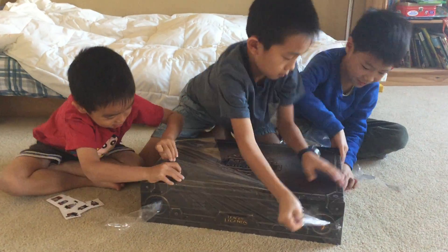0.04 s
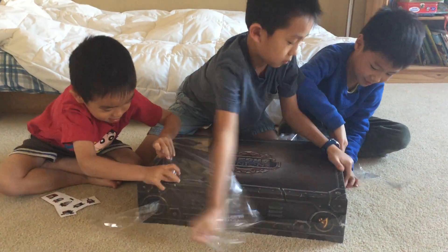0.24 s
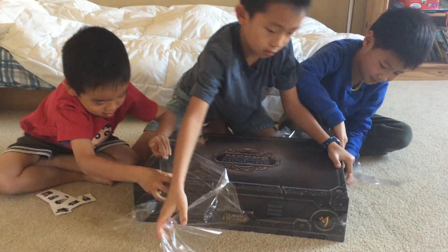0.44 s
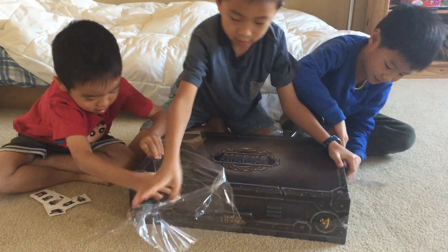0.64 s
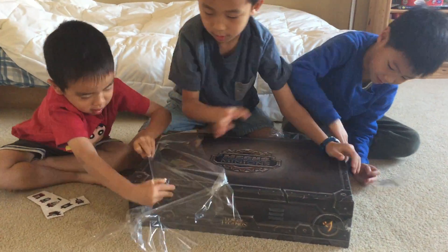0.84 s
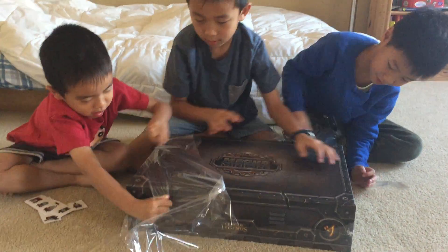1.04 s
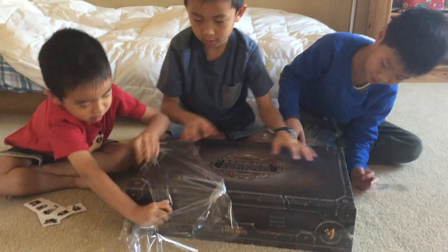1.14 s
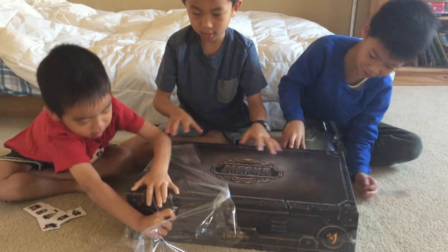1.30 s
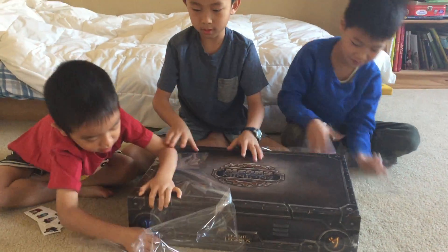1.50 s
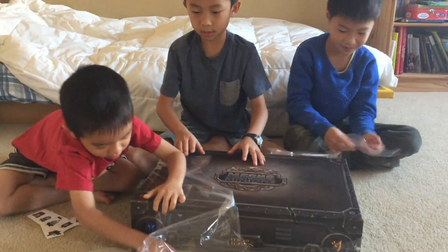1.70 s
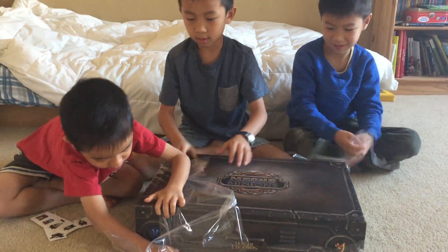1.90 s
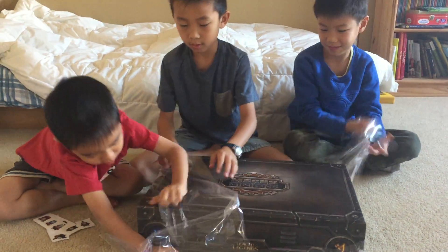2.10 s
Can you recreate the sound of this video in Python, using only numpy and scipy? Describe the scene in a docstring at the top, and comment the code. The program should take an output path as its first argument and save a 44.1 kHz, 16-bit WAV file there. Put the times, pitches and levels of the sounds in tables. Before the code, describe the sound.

Stiff clear film rips, ticks and rustles on a big box in a carpeted bedroom

```python
"""In a carpeted bedroom, plastic shrink-wrap is pulled off a big cardboard box near one microphone.
The film tears in sharp snaps and its creases tick: short damped modes with a noisy crack. Loose film
crinkles as a swarm of tiny pings, swishes over the lid as grainy noise and squeaks in narrow bands.
Hands knock the box, which rings in low modes, and soft thuds come through the floor as single pushes
of air. Noise tails make the room ring briefly, over a deep rumble and faint hiss."""
import sys
import numpy as np
from scipy import signal
from scipy.fft import rfft, irfft, next_fast_len
from scipy.io import wavfile
from scipy.ndimage import uniform_filter1d, map_coordinates

SR = 44100
rng = np.random.default_rng(int(sys.argv[2]) if len(sys.argv) > 2 else 0)


def bounce(signal):
    """Save signal as a 16-bit WAV file at the path given by the first command-line argument."""
    frames = np.transpose(np.atleast_2d(signal))
    limited = np.clip(frames, -1, 1)
    pcm = np.round(limited * 32767).astype(np.int16)
    wavfile.write(sys.argv[1], SR, pcm)


N = 94815  # length in samples
TOP_HZ = 15950  # band limit of the recorder, and the highest crinkle pitch


def amp(db):
    """Decibels to gain."""
    return 10 ** (np.asarray(db) / 20)


def unit(x):
    """Scale to rms 1."""
    return x / np.sqrt(np.mean(x ** 2) + 1e-20)


def decay(t, t60):
    """Exponential decay that falls 60 dB in t60 seconds."""
    return np.exp(-np.log(1000) * t / t60)


def along(points, hz):
    """Read (Hz, value) points on a log frequency axis."""
    point_hz, values = np.transpose(points)
    return np.interp(np.log(hz + 1), np.log(point_hz + 1), values)


def filtered(x, gain):
    """Multiply the spectrum by a gain that is a function of frequency."""
    size = next_fast_len(len(x) + 8192)  # padding keeps the end from wrapping onto the start
    spectrum = rfft(x, size) * gain(np.fft.rfftfreq(size, 1 / SR))
    return irfft(spectrum, size)[:len(x)]


def coloured(x, points):
    """Shape the spectrum of x by (Hz, dB) points and scale it to rms 1."""
    return unit(filtered(x, lambda hz: amp(along(points, hz))))


def add(track, s, sound):
    """Mix a sound into the track at s seconds."""
    start = max(round(s * SR), 0)
    part = sound[:max(N - start, 0)]
    track[start:start + len(part)] += part


def room(x):
    """The bedroom's answer: a fresh diffuse noise tail whose highest treble dies first."""
    # decay time of the room: pitch_hz, t60_s
    room_t60 = [(200, 0.38), (550, 0.35), (1400, 0.28), (3700, 0.34), (9000, 0.28), (15000, 0.18)]
    # colour of the room's answer: pitch_hz, level_db
    room_colour = [(100, 5), (400, 1.5), (700, -1), (1250, 3.5), (1900, 3), (2800, 0.5), (4000, -4.5),
                   (5500, -1.5), (7500, 0.5), (9500, -1.5), (15000, 4.5)]
    build_s = 0.001
    hz, t, noise = signal.stft(rng.standard_normal(SR // 2), SR, nperseg=256)
    colour = amp(along(room_colour, hz)[:, None])
    fade = decay(t, along(room_t60, hz)[:, None])
    tail = signal.istft(noise * colour * fade, SR)[1]
    tail = tail * (1 - np.exp(-np.arange(len(tail)) / SR / build_s))
    return signal.fftconvolve(x, tail / np.linalg.norm(tail))


def ring(modes, t, scatter):
    """Damped modes whose level, pitch and phase differ a little at every blow."""
    out = np.zeros(len(t))
    for hz, db, t60 in modes:
        level = amp(db + rng.normal(0, 0.5))
        pitch_hz = hz * np.exp(scatter * rng.normal())
        out += level * decay(t, t60) * np.sin(2 * np.pi * (pitch_hz * t + rng.random()))
    return out


def click(tilt_db, low_hz):
    """One buckling of the film, of energy 1: its modes and a noisy crack, with little bass."""
    # modes of the taut film: pitch_hz, level_db, t60_s
    film_modes = [(580, -33.5, 0.0069), (1328, -15, 0.0078), (3390, 0, 0.0033), (4830, 1, .004),
                  (8230, 2, 0.0031), (9050, -4.5, 0.0017), (13500, -9.5, 0.0018)]
    film_scatter, attack_s, high_hz = 0.14, .00008, 14300
    crack_db, crack_t60_s = -1, 0.0036
    t = np.arange(SR // 50) / SR
    crack = amp(crack_db) * rng.standard_normal(len(t)) * decay(t, crack_t60_s)
    burst = (ring(film_modes, t, film_scatter) + crack) * (1 - np.exp(-t / attack_s))
    # tilt in dB per octave, flattening out below 1 kHz
    burst = filtered(burst, lambda hz: amp(tilt_db * np.log2(hz + 1000)))
    band = signal.butter(2, [low_hz, high_hz], 'band', fs=SR, output='sos')
    burst = signal.sosfilt(band, burst)
    return burst / np.linalg.norm(burst)


def clicks(rows, low_hz, count):
    """Play (s, dB, room dB, tilt) clicks; the walls get each from count sides, each with its own colour."""
    out = np.zeros(N)
    for s, db, room_db, tilt_db in rows:
        add(out, s, amp(db) * click(tilt_db, low_hz))
        for _ in range(count):
            side_gain = amp(db + room_db) / np.sqrt(count)
            add(out, s, side_gain * room(click(tilt_db, low_hz)))
    return out


def hush():
    """Deep rumble and faint hiss of the room, as steady coloured noise."""
    # colour of the quiet room: pitch_hz, level_db
    hush_colour = [(8, 18), (14, 20.5), (25, 5.5), (50, -3), (110, -13), (230, -8.5), (400, -20.5),
                   (1000, -28.5), (3000, -22), (8000, -33), (11000, -36), (16000, -38)]
    return amp(-48) * coloured(rng.standard_normal(N), hush_colour)


def crinkling():
    """A swarm of tiny creases in clusters, each a short ping of its own pitch and size with a crack."""
    # how loudly the loose film crinkles: time_s, level_db
    crinkle_level = [(0, -43.5), (.07, -60), (.1, -47.5), (.13, -51.5), (.2, -42.5), (.28, -46.5),
                     (.4, -57), (.52, -63), (.61, -62.5), (.66, -56), (.76, -49.5), (.81, -66), (.95, -61),
                     (1.1, -60), (1.34, -53.5), (1.41, -66), (1.48, -51.5), (1.53, -45.5), (1.6, -70),
                     (1.64, -48), (1.74, -48), (1.83, -61), (1.89, -54), (1.92, -57.5), (1.95, -54.5),
                     (1.99, -52.5), (2.07, -55.5), (2.15, -51.5)]
    # colour of the swarm: pitch_hz, level_db
    crinkle_colour = [(150, -19), (380, -0.5), (520, -3), (750, 0.5), (1100, -4), (1600, -2.5), (3200, 1),
                      (4600, -2.5), (6000, -2.5), (9100, -3), (10600, -16.5), (14000, -7.5), (16000, -26)]
    creases_per_s, crease_t60_s, crack_db = 2200, 0.0054, -5.5
    cluster_db, clusters_per_s, spread_db = 3.1, 70, 5
    room_db = -4.5
    t = np.arange(N) / SR
    age = np.arange(SR // 150) / SR

    starts = np.flatnonzero(rng.random(N) < creases_per_s / SR)
    # a smooth random curve makes denser and thinner moments by level
    clusters = cluster_db * map_coordinates(rng.standard_normal(N), [t * clusters_per_s])
    spread = spread_db * np.minimum(rng.exponential(size=len(starts)), 3)
    size = amp(clusters[starts] + spread)[:, None]
    hz = TOP_HZ * rng.random(len(starts))[:, None]
    where = starts[:, None] + np.arange(len(age))
    # creases that overlap share the same crack noise
    crack = amp(crack_db) * rng.standard_normal(N + len(age))[where]
    grains = size * (np.sin(2 * np.pi * hz * age) + crack) * decay(age, crease_t60_s)

    swarm = np.bincount(where.ravel(), grains.ravel(), N)[:N]
    swarm = coloured(swarm, crinkle_colour) * amp(np.interp(t, *np.transpose(crinkle_level)))
    return swarm + amp(room_db) * room(swarm)[:N]


def knocking():
    """The hollow box rings low under the hands; each knock tilts the balance of its modes."""
    # hand knocks: start_s, level_db, tilt_db_per_octave
    knocks = [(.001, -40.5, -10), (0.084, -47.5, 7), (0.18, -45, 11), (.241, -43, 0), (.471, -44.5, -3),
              (0.6461, -38.5, 0.5), (0.704, -44, -11), (0.736, -45, 2), (1.502, -37.5, 1), (1.568, -44, -1),
              (1.796, -64.5, 13)]
    # modes of the cardboard box: pitch_hz, level_db, t60_s
    box_modes = [(217.2, -4.5, 0.13), (263.4, -3, 0.089), (334, -9.5, 0.072), (467, -5.5, 0.068),
                 (528, 3.5, 0.019)]
    attack_s, room_db = 0.001, -13
    t = np.arange(SR // 3) / SR
    out = np.zeros(N)
    pivot_hz = box_modes[1][0]
    for s, db, tilt_db in knocks:
        modes = [(hz, level + tilt_db * np.log2(hz / pivot_hz), t60) for hz, level, t60 in box_modes]
        knock = ring(modes, t, scatter=0.031) * (1 - np.exp(-t / attack_s))
        add(out, s, amp(db) * knock)
    return out + amp(room_db) * room(out)[:N]


def squeaking():
    """Rubbed film and lid sing in fast, uneven stick and slip: gliding narrow bands of noise."""
    # squeaks: peak_s, half_length_s, level_db, pitch_hz, glide_octaves_per_s
    squeaks = [(0.019, 0.02, -53, 110.5, 1.5), (0.045, 0.029, -57, 2720, 1.5),
               (.39, 0.09, -57, 218.5, -1.5), (0.445, 0.0068, -47.5, 8780, -9),
               (0.456, .005, -49, 4060, -18), (0.474, 0.0043, -44.5, 1950, -36.5),
               (0.494, 0.00262, -38, 7170, -2.5), (0.857, .012, -51.5, 2830, 6),
               (0.875, 0.0067, -58, 6700, -1), (0.891, 0.023, -52, 8840, -0.5),
               (0.891, .015, -56, 3310, -1.5), (1.185, 0.013, -57.5, 871, 0.5),
               (1.311, 0.033, -55.5, 3520, 1.5), (1.435, 0.053, -64, 500, 0), (1.969, .004, -54, 3650, -28)]
    width, blur_hz, room_db = 0.1, 34.8, -7.5  # band width is a share of the pitch plus blur_hz
    out = np.zeros(N)
    t = np.arange(-SR // 8, SR // 8) / SR
    for s, half, db, hz, glide in squeaks:
        blur = lambda f: np.exp(-(f / (width * hz + blur_hz)) ** 2)
        a, b = (unit(filtered(rng.standard_normal(len(t)), blur)) for _ in range(2))
        pitch_hz = hz * 2 ** (glide * np.clip(t, -2 * half, 2 * half))
        phase = 2 * np.pi * np.cumsum(pitch_hz) / SR
        # two slow noises on a cosine and a sine make a band of noise around the pitch
        rub = amp(db) * np.exp(-(t / half) ** 2) * (a * np.cos(phase) + b * np.sin(phase))
        add(out, s + t[0], rub[s + t >= 0])
    return out + amp(room_db) * room(out)[:N]


def ticking():
    """Single creases flip as the film is handled, thinner than the snaps; each rebounds once, more weakly."""
    # crease flips: start_s, level_db, tilt_db_per_octave
    ticks = [(.0258, -23, -12), (.0348, -30, 0), (0.035, -23, -4), (0.0851, -14.5, -13),
             (0.0924, -14.5, -6.5), (0.1577, -24, 7), (0.163, -24, 5), (0.1806, -30, -7), (.196, -23, 15),
             (0.282, -14, 7), (0.395, -28, 3.5), (0.4914, -23, -9), (0.5495, -25, -7), (0.5526, -36, -1),
             (0.575, -28.5, -2.5), (.6311, -31, 13), (.6585, -25.5, -11.5), (0.69, -43, 0),
             (0.7084, -21.5, 3), (0.7095, -17, -10), (.7468, -25, -2.5), (0.828, -25.5, -20.5),
             (0.831, -35, 13), (1.0826, -21, -2), (1.1142, -23.5, -5.5), (1.135, -24, -2),
             (1.16, -29, -4.5), (1.162, -27, -7), (1.1708, -25, 1), (1.179, -21, -9), (1.1798, -31, -4),
             (1.184, -29, 15), (1.2025, -28, 3), (1.2492, -24.5, -2), (1.348, -29, 4), (1.407, -36, -1),
             (1.4373, -29, -2.5), (1.5018, -30, 3), (1.509, -27, -1), (1.5136, -17.5, -5), (1.523, -15, -6),
             (1.5256, -24, -4), (1.5275, -16.5, -1.5), (1.5301, -10.5, -2), (1.5325, -15.5, -0.5),
             (1.5347, -27, 4), (1.5407, -23.5, 3), (1.5972, -26.5, 1.5), (1.621, -24, -3),
             (1.6308, -24.5, -1), (1.6369, -22.5, 4), (1.6517, -36, 3), (1.6695, -33.5, -8),
             (1.6968, -22, -3), (1.7009, -18, -3.5), (1.734, -24, -9), (1.863, -30, -3),
             (1.9355, -28, -8.5), (1.9588, -30, 0), (1.977, -27, -5), (2.0839, -25, -3), (2.1297, -26, -2)]
    low_hz, room_db = 680, -3
    rebound_s, rebound_db = .0016, -10  # the delay varies from half to one and a half times rebound_s
    flips = [(s, db, room_db, tilt_db) for s, db, tilt_db in ticks]
    rebounds = []
    for s, db, _, tilt_db in flips:
        later_s = s + rebound_s * (.5 + rng.random())
        rebounds.append((later_s, db + rebound_db, room_db, tilt_db))
    # the rebounds are heard directly, with no answer from the walls
    return clicks(flips, low_hz, count=1) + clicks(rebounds, low_hz, count=0)


def thudding():
    """Soft thuds of hands and knees: each is one push of air with no ring of its own."""
    # thuds: centre_s, peak_db, pitch_hz
    thuds = [(0.161, -34.5, 58), (0.2944, -32, 81), (0.345, -37, 61), (0.467, -37, 81), (.518, -39, 75.6),
             (0.94, -35, 64), (0.9597, -33.5, 57), (1.05, -36.5, 82), (1.097, -38.5, 99),
             (1.111, -35, 70.5), (1.351, -53, 45.4), (1.753, -47.5, 68.7), (1.816, -33, 74),
             (1.833, -39, 47.5)]
    room_db = -14
    t = np.arange(N) / SR
    out = np.zeros(N)
    for s, db, hz in thuds:
        u = (np.pi * hz * (t - s)) ** 2
        out += amp(db) * (2 * u - 1) * np.exp(-u)
    return out + amp(room_db) * room(out)[:N]


def tearing():
    """The stretched film gives way in quick runs of snaps."""
    # snaps: start_s, level_db, room_share_db, tilt_db_per_octave
    snaps = [(.2086, 3, -12, 1), (.2098, -3.5, -3, -5.5), (.2107, 1, -10, 0.5), (.2121, -0.5, -13, 6),
             (.2135, 3, -3, 0), (.2409, -1, -1, -2.5), (.2423, -4, -3, -6), (.2555, 2, -11, -1),
             (.2566, -2.5, -24, 4.5), (.9400, -4.5, 1, 5.5), (.9409, -0.5, 0, -1.5), (.9423, -5, 3.5, 0.5),
             (.9454, -4.5, -11, -1)]
    return clicks(snaps, low_hz=263, count=3)


def sliding():
    """Film rubs over the lid with a grainy swish that swells and stops."""
    # strokes over the lid: peak_s, rise_s, fall_s, level_db
    slides = [(0.488, 0.045, 0.021, -44), (0.883, 0.06, 0.09, -51)]
    # colour of the swish: pitch_hz, level_db
    slide_colour = [(300, -2), (900, -11.5), (1900, -1.5), (3200, -2), (5000, -0.5), (7000, 1),
                    (8800, -0.5), (10500, -11), (13500, -6.5), (16000, -18)]
    grain_db, room_db = 3, -2
    t = np.arange(N) / SR
    stroke = np.zeros(N)
    for s, rise, fall, db in slides:
        stroke += amp(db) * np.exp(-((t - s) / np.where(t < s, rise, fall)) ** 2)
    # smoothed noise roughens the loudness
    grain = amp(grain_db * unit(uniform_filter1d(rng.standard_normal(N), size=60)))
    swish = stroke * coloured(grain * rng.standard_normal(N), slide_colour)
    return swish + amp(room_db) * room(swish)[:N]


def scene():
    """Film, box and room at one microphone."""
    room_and_box = hush() + knocking() + thudding()
    film = crinkling() + squeaking() + ticking() + tearing() + sliding()
    return (room_and_box + film)[None]


def record(dry):
    """The recorder rounds off the highest peaks and keeps nothing above its band limit."""
    clip_level = .62  # of full scale
    held = dry / (1 + (dry / clip_level) ** 6) ** (1 / 6)
    # the cutoff slopes over 500 Hz around TOP_HZ
    cutoff = lambda hz: np.clip((TOP_HZ - hz) / 500 + .5, 0, 1)
    return np.array([filtered(channel, cutoff) for channel in held])


dry = scene()
out = record(dry)
bounce(out)
```